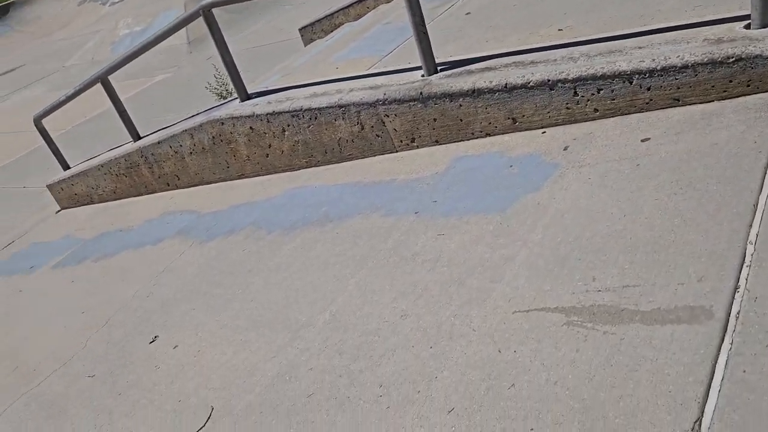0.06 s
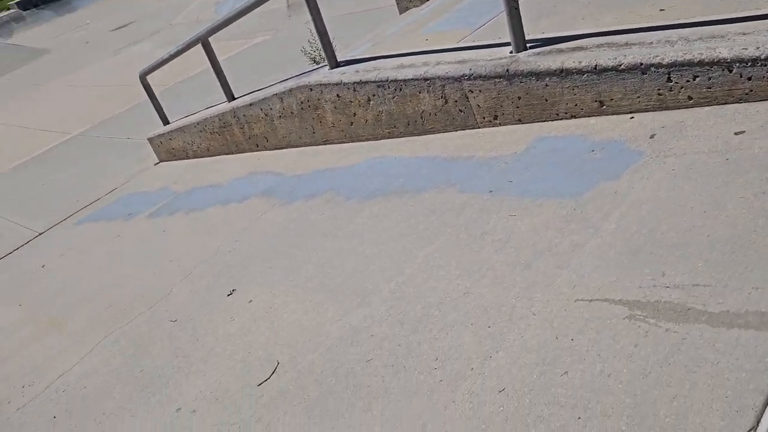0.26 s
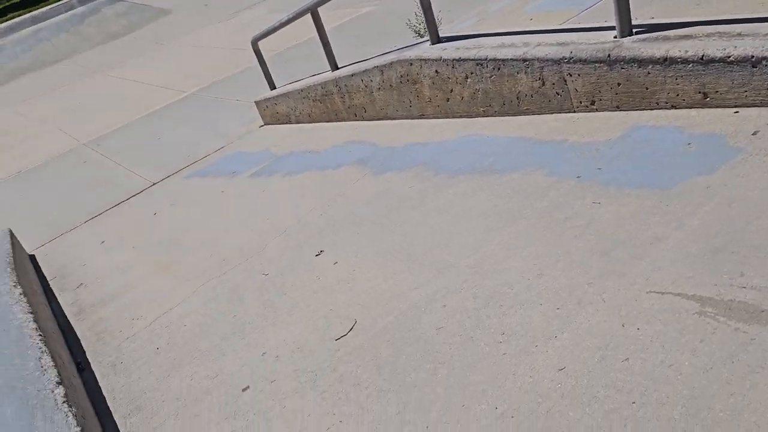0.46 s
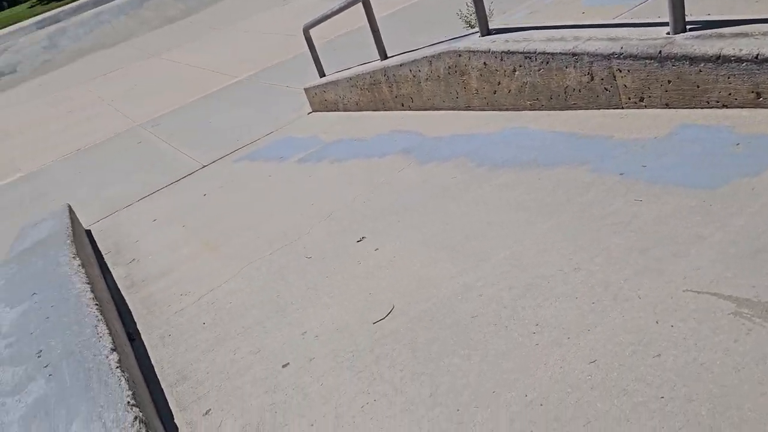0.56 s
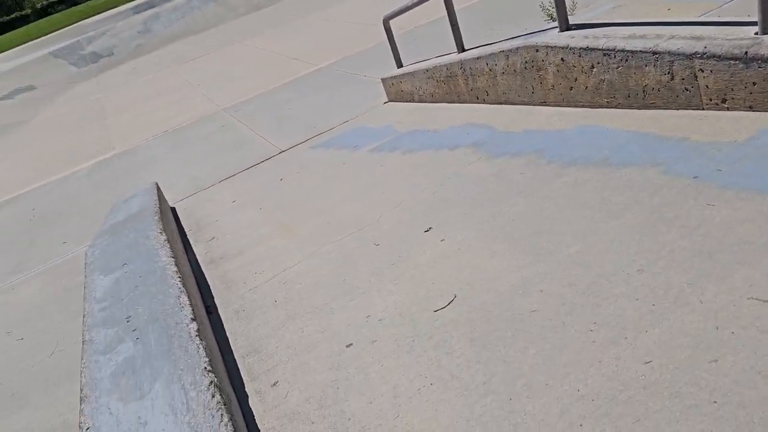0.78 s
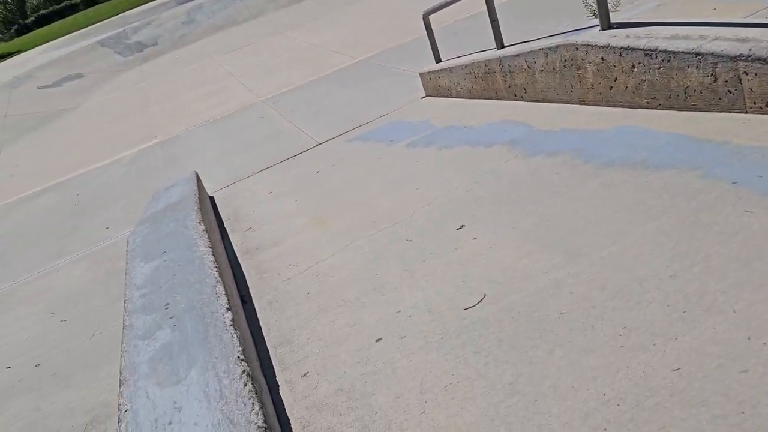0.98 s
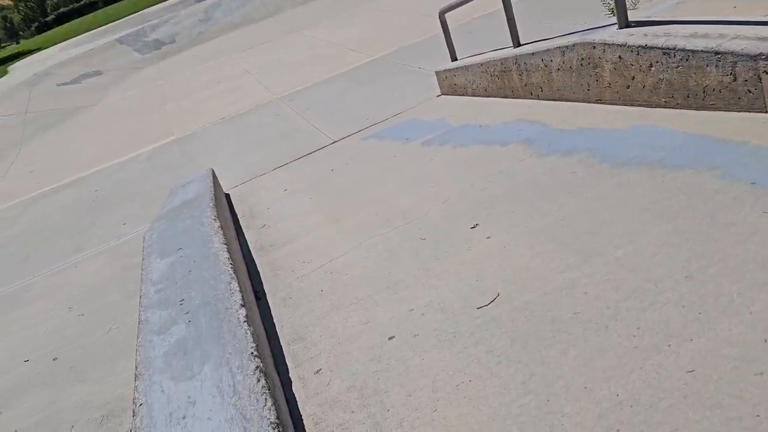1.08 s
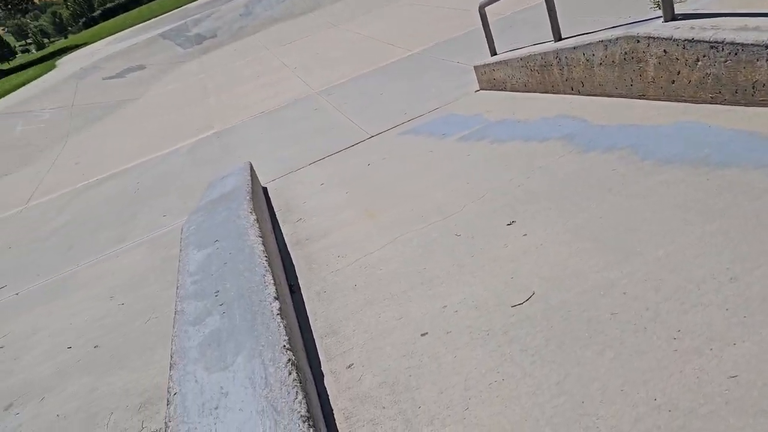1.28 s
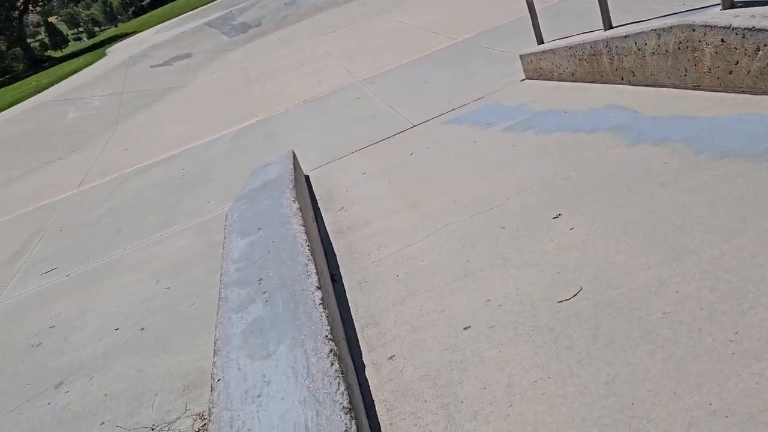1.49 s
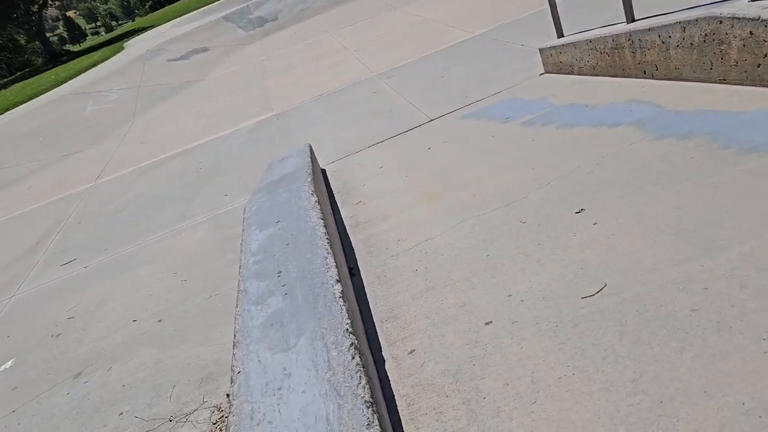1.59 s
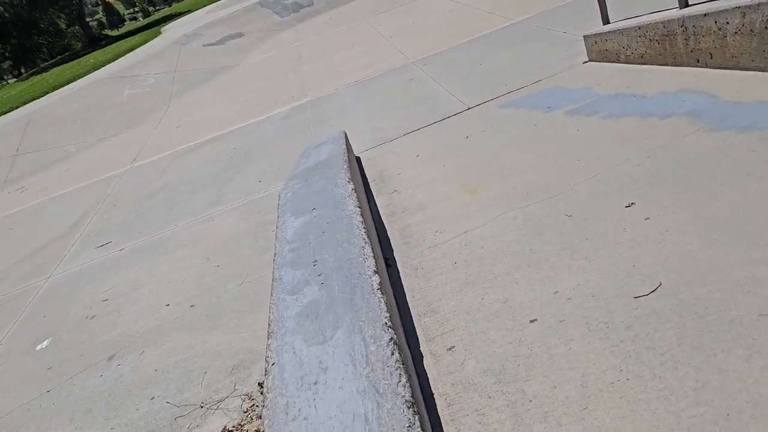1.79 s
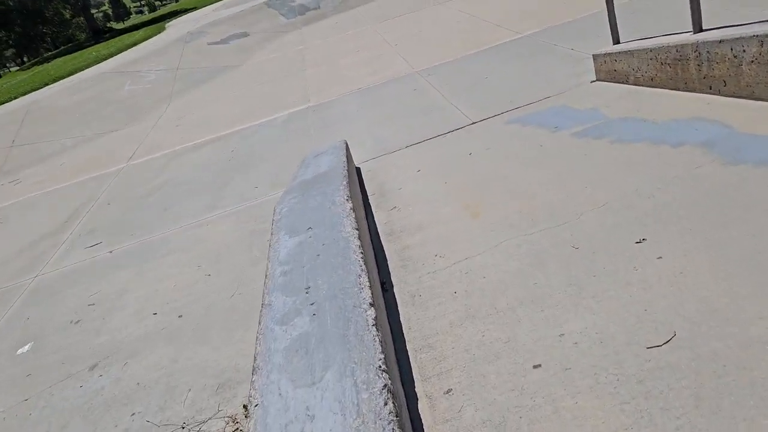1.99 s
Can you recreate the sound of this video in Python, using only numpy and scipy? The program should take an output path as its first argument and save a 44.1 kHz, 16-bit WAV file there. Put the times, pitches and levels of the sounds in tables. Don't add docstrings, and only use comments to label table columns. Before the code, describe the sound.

Close stereo camera microphone in an open skatepark: short gritty wheel roll, rapid plywood clacks and loose hardware ticks, sparser taps, near quiet, then two more knocks and a light scrape over faint wind.

```python
import sys
import numpy as np
from scipy import signal
from scipy.fft import rfft, irfft
from scipy.io import wavfile
from scipy.ndimage import uniform_filter1d, map_coordinates

SR = 44100
rng = np.random.default_rng(int(sys.argv[2]) if len(sys.argv) > 2 else 0)


def boost(x):
    u = np.asarray(x, float) / 20
    return 10 ** u


def master_out(mix):
    frames = np.transpose(np.atleast_2d(mix))
    ceiling = np.clip(frames, -1, 1)
    pcm = np.round(ceiling * 32767).astype(np.int16)
    wavfile.write(sys.argv[1], SR, pcm)


N = 90404

# [start_s, level_db]
ROLL_LEVEL = [(0, -24), (.07, -33.5), (.23, -37.5), (.33, -35), (.38, -45), (.44, -29), (.56, -47),
              (.65, -50), (.72, -46.5), (.79, -48.5), (.9, -48), (1.03, -78.5), (1.06, -49), (1.19, -65),
              (1.22, -78.5), (1.59, -74), (1.66, -44.5), (1.73, -57), (1.78, -79)]
# [start_s, level_db]
RIDER_MUTING = [(0, -7.5), (.24, -12), (.26, 3.5)]
# [pitch_hz, level_db]
LOADED_WHEEL_COLOUR = [(520, -5), (750, -16), (1150, -7), (1580, -20), (2000, -18.5), (3300, -20.5),
                       (5500, -24.5), (8600, -36), (13000, -43.5)]
# [pitch_hz, level_db]
EMPTY_WHEEL_COLOUR = [(130, -26), (503, -7), (681, -19.5), (1060, -15.5), (1700, -11.5), (2450, -36.5),
                      (3600, -23.5), (7000, -35), (14900, -38)]
# [pitch_hz, level_db, fade_60db_s]
BOOM_MODES = [(312.9, 11.5, 0.094), (187.4, -39.5, 0.053), (282, -1.5, 0.066)]
# [pitch_hz, level_db, fade_60db_s]
DECK_MODES = [(537, 2, 0.12), (595.3, -4, 0.08), (635, 1.5, 0.053), (690, 3.5, 0.046), (746, -4, 0.13),
              (854, -37.5, 0.3), (1110, -13, 0.022), (1124, -8, 0.082), (1285.4, -5.5, 0.076),
              (1366, -20, 0.18), (1575, -10.5, 0.021), (2187, -32, 0.06), (3600, -32, .04)]
# [pitch_hz, likeness_share]
HISS_LIKENESS = [(500, 1), (1500, 0.84), (4000, 0.17), (7000, 0.071), (15000, 0.96)]
# [pitch_hz, level_db]
AIR_COLOUR = [(53, -29.5), (90, -15), (145, -15), (183, -27.5), (248, -29.5), (294, -37), (3580, -61),
              (4740, -59.5), (9000, -69.5), (15500, -89)]
# [pitch_hz, likeness_share]
AIR_LIKENESS = [(60, 0.98), (240, 0.82), (950, 0.08), (3770, 0.02), (15000, 0.05)]
# [pitch_hz, left_minus_right_db]
AIR_BALANCE = [(60, 4), (240, 0.5), (950, 6.5), (3770, 8.5), (15000, 13)]
# [start_s, level_db]
HUM_LEVEL = [(0.0, -33.5), (.12, -29.5), (0.3, -43), (0.45, -56.5), (0.58, -33), (0.72, -52), (.85, -49.5),
             (1.12, -41), (1.35, -42.5), (1.5, -36.5), (1.57, -54), (1.85, -42.5), (2.05, -48)]
# [start_s, level_db]
GUST_LEVEL = [(0.0, -46.5), (1.2, -56.5), (1.31, -36.5), (1.48, -48.5), (2.05, -47.5)]
# [pitch_hz, fade_60db_s]
YARD_FADE = [(300, 0.074), (1500, 0.24), (8000, 0.04)]
# [start_s, level_db,
# pitch_hz, fade_60db_s]
PING_EVENTS = [(.218, -37.5, 3660, 0.018), (0.2455, -18, 3190, 0.019), (0.257, -9.5, 6240, 0.011),
               (0.268, -57, 6840, 0.0083), (.291, -27.5, 3640, .04), (.304, -32, 3700, 0.034),
               (.315, -38, 3680, 0.026), (0.287, -4, 983, 0.027), (.298, -5, 1053, 0.036),
               (.35, -47, 3590, 0.11), (.369, -35, 3800, .015), (0.385, -30, 3650, .02),
               (.399, -22, 2430, .012), (.435, -36, 3600, 0.027), (0.589, -45, 3570, 0.019),
               (0.634, -45.5, 4570, 0.018), (.660, -23, 2250, 0.017), (.689, -37, 3580, .03),
               (0.88, -17, 1398, 0.048), (.894, -23, 2090, 0.016), (0.947, -53, 4120, 0.013),
               (.973, -55, 4120, 0.017), (1.05, -51, 5760, 0.01), (1.071, -41, 3340, .015),
               (1.113, -49, 5700, 0.013), (1.182, -45, 2120, .02), (1.546, -34, 3620, 0.033),
               (1.558, -39, 3720, .03), (1.652, -47, 3600, .015), (1.626, -47, 2240, 0.032),
               (1.655, -44, 2250, .04), (1.668, -40, 2275, .04), (1.70, -54, 3600, .04),
               (1.714, -46, 7400, 0.011), (1.874, -46.5, 5220, 0.013), (1.869, -36, 2270, .015),
               (1.875, -37, 2160, .02), (2.027, -55, 4820, 0.015)]
# [pitch_hz, level_db]
CRACK_COLOUR = [(880, -11.5), (1500, -5), (2200, -8.5), (2750, -15.5), (3600, -15.5), (5600, -25.5),
                (7300, -25), (11800, -27), (15500, -27.5)]
# [start_s, boom_pitch_share, boom_ring_share]
FOOT_LOAD = [(.245, 0.95, 0.39), (.29, 0.93, 0.51), (.384, .94, 1.6), (.4, .94, 1.5), (.46, .95, .8),
             (.658, 0.94, 1.28), (.72, 0.78, 0.56), (.804, 0.92, 1.18), (.882, 0.994, 0.36),
             (1.05, 1.19, 0.25), (1.539, 0.92, 0.56), (1.603, 0.97, 0.89), (1.698, 0.95, 0.9)]
# [start_s, thump_db, thump_hz, boom_db, crack_db]
PRESSED_KNOCKS = [
    (0.245, -7, 540, -10.5, -20.5),
    (0.252, -6, 1138, -35, -39.5),
    (0.2881, -11.5, 631, -10, -29),
    (0.294, -13.5, 538, -20, -27.5),
    (0.735, -26.5, 558, -47, -72),
    (0.8817, -5, 673.5, -13, -35),
    (1.05, -21, 635, -33, -61),
    (1.113, -27.5, 690, -66, -53.5),
    (1.539, 0.5, 619, -18.5, -31.5),
    (1.715, -27, 660, -41, -55),
]
# [start_s, thump_db, thump_hz, boom_db, crack_db]
FREE_KNOCKS = [
    (0.384, -4.5, 604, -12, -26.5),
    (0.399, -2.5, 692, -20, -33),
    (0.6581, -3, 635, -14.5, -35),
    (0.701, -18.5, 666, -49.5, -46),
    (0.8042, -6.5, 690, -16, -33.5),
    (1.603, -12, 653, -20.5, -38.5),
    (1.652, -18.5, 586, -31, -51),
]
# [start_s, thump_db, crack_db]
WHEEL_TAPS = [(.438, -20, -64), (.460, -19.5, -47), (.488, -23, -61), (.582, -34, -69), (.552, -35.5, -58),
              (.710, -31, -70), (.868, -32.5, -72), (.892, -14.5, -48), (.946, -49, -71), (0.974, -45, -68),
              (1.04, -34, -50.5), (1.073, -38, -53.5), (1.088, -36, -74), (1.142, -46, -77.5),
              (1.16, -43, -82), (1.183, -42, -62), (1.558, -21, -55), (1.617, -24.5, -53),
              (1.667, -29, -55), (1.690, -26, -57), (1.732, -39, -74.5)]
# [start_s, level_db, rise_s, fade_60db_s]
SCUFF_EVENTS = [
    (1.514, -42, 0.025, 0.017),
    (1.869, -28, 0.0008, 0.039),
    (1.881, -34.5, 0.0023, 0.058),
    (1.918, -51, .004, 0.03),
]
# [pitch_hz, level_db]
SOLE_COLOUR = [(150, -25), (250, -4), (736, -10.5), (1400, -28.5), (2140, -18.5), (3000, -35.5),
               (7570, -47.5), (10000, -57.5), (13000, -63.5)]
# [start_s, left_lag_samples]
BOARD_LAG = [(0, 14.1), (.3, 11.3), (.45, 8.7), (.65, 7.35), (1.1, 6), (1.6, 4.16), (2.05, 10.5)]
# [pitch_hz, left_minus_right_db]
BOARD_BALANCE = [(100, 0.5), (300, 0.5), (800, 2.5), (3000, 0.5), (7000, 0), (13000, -4.5)]


def evened(x):
    return x / np.sqrt(np.mean(x ** 2) + 1e-20)


def read(points, hz):
    table_hz, value = np.transpose(points)
    return np.interp(np.log(hz + 1), np.log(table_hz + 1), value)


def curve(points):
    return np.interp(np.arange(N) / SR, *np.transpose(points))


def colour(x, spectrum):
    length = x.shape[-1]
    size = length + 4096
    gain = boost(read(spectrum, np.fft.rfftfreq(size, 1 / SR)))
    return irfft(rfft(x, size) * gain, size)[..., :length]


def rise(t, rise_s):
    return np.minimum(t / rise_s, 1)


def ring(modes, detune=1.0):
    t = np.arange(SR // 4) / SR
    total = np.zeros(len(t))
    for (hz, db, t60), share in zip(modes, detune * np.ones(len(modes))):
        total += boost(db - 60 * t / t60) * np.sin(2 * np.pi * hz * share * t)
    return total


def clicks(size, per_s, spread_db):
    chance, sign, big = rng.random((3, size))
    return (chance < per_s / SR) * np.sign(sign - 0.5) * boost(-spread_db * np.log(big + 1 / 20))


def partner(a, b, same):
    return same * a + np.sqrt(1 - same ** 2) * b


def hiss(size, spectrum, ripple_db=2.5):
    a, b = rfft(rng.standard_normal((2, size)))
    same = np.clip(read(HISS_LIKENESS, np.fft.rfftfreq(size, 1 / SR)), 0, 1)
    bumps = uniform_filter1d(rng.standard_normal(len(a)), size=size // 150)
    ripple = boost(ripple_db * evened(bumps))
    flicker = uniform_filter1d(rng.standard_normal(size), size=100)
    grain = boost(2.0 * evened(flicker))
    ports = irfft(ripple * np.array([a, partner(a, b, same)]), size)
    return evened(colour(ports * grain, spectrum))


def rolling():
    t = np.arange(N) / SR
    level_db = curve(ROLL_LEVEL)
    body = ring(DECK_MODES) + boost(-9) * ring(BOOM_MODES)
    body = body * rise(np.arange(len(body)) / SR, 0.003)
    strikes = evened(clicks(N, per_s=2000, spread_db=4.5)) * boost(level_db + curve(RIDER_MUTING))
    buzz = signal.fftconvolve(strikes, body / np.linalg.norm(body))[:N]
    loaded = np.clip((0.2 - t) / 0.025, 0, 1)
    wheels = loaded * boost(1) * hiss(N, LOADED_WHEEL_COLOUR, ripple_db=1)
    wheels = wheels + (1 - loaded) * hiss(N, EMPTY_WHEEL_COLOUR, ripple_db=0.72)
    return boost(1.5) * buzz + wheels * boost(level_db - 3.5)


def yard(x):
    taps = np.zeros((2, SR // 2))
    at = np.arange(80, SR // 2 - 20, 20)
    signs = rng.choice([-1., 1.], (2, len(at)))
    np.put_along_axis(taps, at + rng.integers(0, 20, (2, len(at))), signs, 1)
    hz, t, z = signal.stft(taps, SR, nperseg=256)
    z = z * boost(-60 * t / read(YARD_FADE, hz)[:, None])
    z = z * (hz / (hz + 1500))[:, None]
    tail = signal.istft(z, SR, nperseg=256)[1]
    return signal.fftconvolve(x[None], tail / np.linalg.norm(tail[0]), axes=1)[:, :N]


def air():
    frames, hz = N // 256 + 5, np.fft.rfftfreq(1024, 1 / SR)
    a, b, c, d, patches = rng.standard_normal((frames, 513, 5)).T
    patches = uniform_filter1d(patches, size=8, axis=0)
    patches = evened(uniform_filter1d(patches, size=10, axis=1))
    same = np.clip(read(AIR_LIKENESS, hz), -1, 1)[:, None]
    left = a + 1j * b
    z = np.array([left, partner(left, c + 1j * d, same)])
    z = z * boost(read(AIR_COLOUR, hz)[:, None] + 2.2 * patches)
    z = z * boost(np.array([0.5, -0.5])[:, None] * read(AIR_BALANCE, hz))[:, :, None]
    wash = signal.istft(z, nperseg=1024, noverlap=768)[1][:, :N]
    return boost(-47.5) * evened(wash)


def hum():
    pitch_hz, width_hz = 70.37, 6
    f = np.fft.rfftfreq(N, 1 / SR)
    peak = 1 / (1 + (2 * (f - pitch_hz) / width_hz) ** 2)
    tone = evened(irfft(rfft(rng.standard_normal(N)) * peak, N))
    return tone * boost(curve(HUM_LEVEL) - 2.5 + np.array([[0.8], [-0.8]]))


def gusts():
    f = np.fft.rfftfreq(N, 1 / SR)
    band = f ** 2 / (f ** 2 + 300) / (1 + (f / 50.4) ** 4)
    a, b = irfft(rfft(rng.standard_normal((2, N))) * band, N)
    ports = evened(np.array([a, partner(a, b, 0.35)]))
    return ports * boost(curve(GUST_LEVEL) + np.array([[0.8], [-0.8]]))


def ping(db, hz, t60):
    pair = ring([(hz, db, t60), (hz * 1.1, db - 12, t60)])
    return pair * rise(np.arange(len(pair)) / SR, 0.0012)


def foot(s):
    at, pitch_share, ring_share = np.transpose(FOOT_LOAD)
    return np.interp(s, at, pitch_share), np.interp(s, at, ring_share)


def wheel_thump(t, hz):
    held = rise(t, 0.0043) * boost(-60 * np.maximum(t - 0.0041, 0) / 0.015)
    sag = 1 + 0.13 * (0.5 - rise(t, 0.0061))
    turn = 2 * np.pi * hz * np.cumsum(sag) / SR
    return boost(-0.5) * held * (np.sin(turn) + boost(-15) * np.sin(2.3 * turn))


def deck_ring(t, last):
    uneven_db = 1.5 * rng.standard_normal(len(DECK_MODES))
    modes = [(hz, db + extra, t60 * last) for (hz, db, t60), extra in zip(DECK_MODES, uneven_db)]
    return ring(modes, rng.uniform(0.95, 1.02, len(DECK_MODES))) * rise(t, 0.0018)


def truck_rattle(t, deck, last):
    strikes = clicks(len(t), per_s=1000, spread_db=1.6) * boost(-60 * t / (0.14 * last))
    return signal.fftconvolve(strikes, deck)[:len(t)]


def deck_boom(t, pitch_share, ring_share):
    modes = [(hz, db, t60 * ring_share) for hz, db, t60 in BOOM_MODES]
    return rise(t, 0.0025) * ring(modes, pitch_share)


def crack_noise(t, last):
    fade = boost(-60 * t / 0.022) + boost(-5.5 - 60 * t / (0.2 * last))
    return hiss(len(t), CRACK_COLOUR) * rise(t, 0.0023) * fade


def knock(thump_db, thump_hz, boom_db, crack_db, flex, last=1.0):
    t = np.arange(SR // 4) / SR
    deck = deck_ring(t, last)
    wood = wheel_thump(t, thump_hz) + boost(-14) * deck + boost(-27.5) * truck_rattle(t, deck, last)
    boom = boost(boom_db - 3.5) * deck_boom(t, *flex)
    return boost(thump_db) * wood + boom + boost(crack_db + 5.5) * crack_noise(t, last)


def scuff(db, rise_s, t60):
    t = np.arange(SR // 4) / SR
    fade = boost(db - 60 * np.maximum(t - rise_s, 0) / t60)
    return hiss(len(t), SOLE_COLOUR) * rise(t, rise_s) * fade


def add(mix, s, sound):
    part = mix[:, round(s * SR):][:, :sound.shape[-1]]
    part += sound[..., :part.shape[-1]]


def at_ports(board):
    half_lag = curve(BOARD_LAG) / 2
    ports = []
    for sound, side in zip(board, (1, -1)):
        moved = map_coordinates(sound, [np.arange(N) - side * half_lag], order=3, mode="nearest")
        ports.append(colour(moved, [(hz, side * db / 2) for hz, db in BOARD_BALANCE]))
    return np.array(ports)


def scene():
    board = rolling()
    pressed_ring = 0.51
    for s, *row in PING_EVENTS:
        add(board, s, ping(*row))
    for s, *row in PRESSED_KNOCKS:
        add(board, s, knock(*row, foot(s), last=pressed_ring))
    for s, *row in FREE_KNOCKS:
        add(board, s, knock(*row, foot(s)))
    for s, db, crack_db in WHEEL_TAPS:
        tap_hz = 702 * rng.uniform(0.9, 0.97)
        add(board, s, knock(db, tap_hz, db - 8.5, crack_db, foot(s), last=pressed_ring))
    for s, *row in SCUFF_EVENTS:
        add(board, s, scuff(*row))
    return at_ports(board) + boost(-19.5) * yard(board[0]) + air() + hum() + gusts()


def band_limit(x):
    return signal.sosfilt(signal.butter(12, 16660, fs=SR, output="sos"), x)


def record(dry):
    size = 2 * N
    f = np.fft.rfftfreq(size, 1 / SR)
    dip = 1 - 0.94 * np.exp(-((f - 10000) / 1050) ** 4)
    treble_edge = 1 / (1 + (f / 15800) ** 60)
    mirrored = np.hstack([dry, dry[:, ::-1]])
    x = irfft(rfft(mirrored) * dip * treble_edge, size)[:, :N]
    ceiling = 1.02
    return band_limit(x / (1 + (x / ceiling) ** 8) ** (1 / 8))


dry = scene()
out = record(dry)
master_out(out)
```